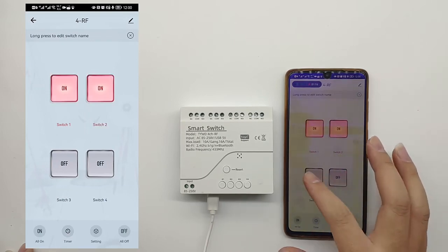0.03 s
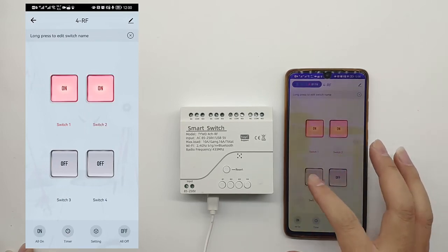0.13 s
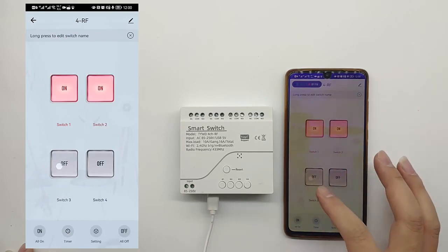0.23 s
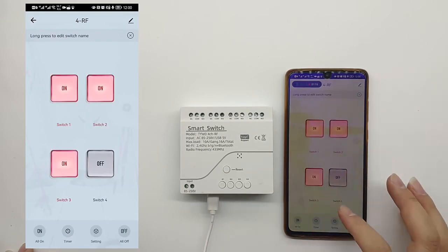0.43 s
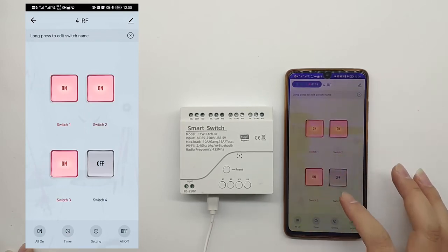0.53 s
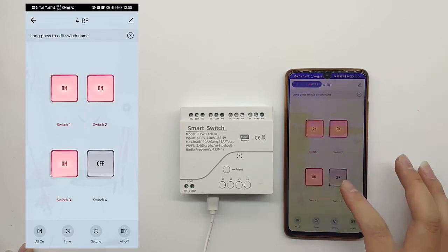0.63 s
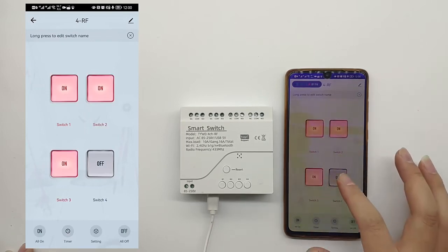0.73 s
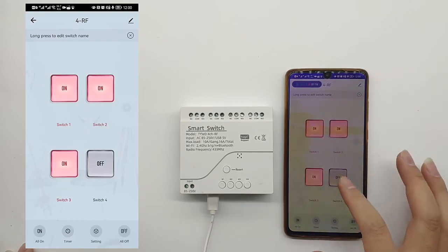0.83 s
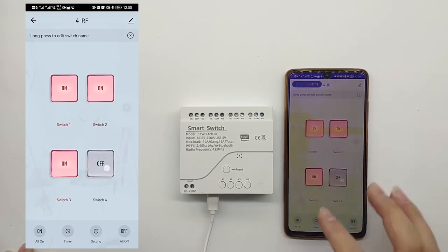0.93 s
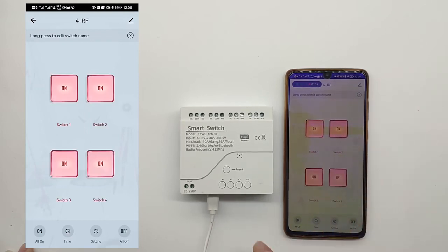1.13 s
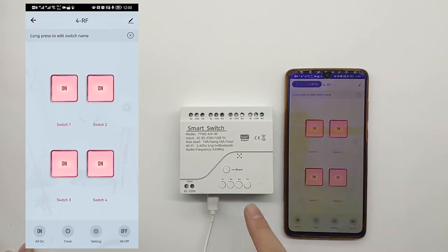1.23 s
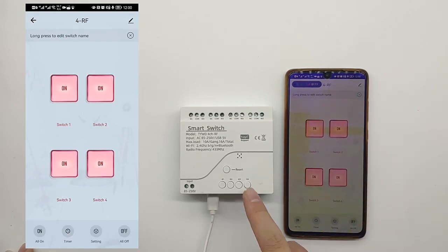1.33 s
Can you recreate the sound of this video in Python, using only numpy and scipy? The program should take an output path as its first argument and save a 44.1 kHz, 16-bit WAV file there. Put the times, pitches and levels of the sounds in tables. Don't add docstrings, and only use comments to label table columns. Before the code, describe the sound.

A small relay snaps with a tiny rattling bounce, cloth rustles faintly, a fingertip ticks on glass, then a second, louder relay snaps; close microphone in a quiet, fairly dry room with low distant traffic hum.

```python
import sys
import numpy as np
from scipy import signal
from scipy.fft import rfft, irfft, next_fast_len
from scipy.io import wavfile
from scipy.ndimage import uniform_filter1d, map_coordinates

SR = 44100
rng = np.random.default_rng(int(sys.argv[2]) if len(sys.argv) > 2 else 0)


def store_wav(level_fs):
    pcm = np.round(np.clip(np.atleast_2d(level_fs), -1, 1) * 32767)
    wavfile.write(sys.argv[1], SR, pcm.T.astype(np.int16))


def ratio_of_db(decibels):
    return 10 ** (np.asarray(decibels, float) / 20)


N = 61739


def unit(x):
    return x / np.sqrt(np.mean(x ** 2) + 1e-20)


def along(points, hz):
    f, v = np.transpose(points)
    return np.interp(np.log(hz + 1), np.log(f + 1), v)


def wobble(rate):
    knots = rng.standard_normal(int(N * rate / SR) + 4)
    return map_coordinates(knots, [np.arange(N) * rate / SR])


def filtered(x, response):
    n = x.shape[-1]
    m = next_fast_len(n + 8192)
    return irfft(rfft(x, m) * response(np.fft.rfftfreq(m, 1 / SR)), m)[..., :n]


def dying(t60, length):
    hz, t, z = signal.stft(rng.standard_normal((2, length)), SR, nperseg=64)
    decay = ratio_of_db(-60 * t / along(t60, hz)[:, None])
    tail = signal.istft(z * decay, SR, nperseg=64)[1][:, :length]
    return tail / np.linalg.norm(tail[0])


def rush(gain, patchy_db):
    # hz, correlation
    alike = [(30, .97), (200, 0.97), (380, 0.21), (700, 0.54), (1290, -0.3), (3000, 0.011)]
    # hz, level_db
    lean = [(60, -7.5), (200, -7.5), (380, -3.5), (1290, -7.5), (2400, -5.5), (4400, -3.5), (8100, -2.5),
            (15000, -28.5)]
    z = signal.stft(rng.standard_normal((2, N)), nperseg=512)[2]
    field = uniform_filter1d(rng.standard_normal(z.shape[1:]), size=6, axis=0)
    field = uniform_filter1d(field, size=10, axis=1)
    pair = signal.istft(z * ratio_of_db(patchy_db * unit(field)), nperseg=512)[1][:, :N]

    def mid_and_side(hz):
        angle = np.arccos(np.clip(along(alike, hz), -1, 1)) / 2
        return gain(hz) * np.array([np.cos(angle), np.sin(angle)])

    mid, side = filtered(pair, mid_and_side)
    ports = np.array([mid + side, mid - side])
    out = filtered(ports, lambda hz: ratio_of_db(np.outer([.5, -.5], along(lean, hz))))
    return out / np.std(out.mean(0))


def relay(pull, modes, case):
    # hz, t60_s
    case_t60 = [(1000, 0.07), (3000, 0.023), (6000, 0.022), (12000, 0.018)]
    # hz, t60_s
    ring_t60 = [(1000, .03), (3300, .018), (9000, .026), (13000, .032)]
    scatter_db, case_db, rise_s = 1.5, 6, .0005
    fade_db_s = [247, 0]
    n = SR // 8
    t = np.arange(n) / SR
    hz, level = np.transpose(modes)[:, :, None]
    decay_db = 60 * t / along(ring_t60, hz)
    out = np.zeros((2, N))
    for start_s, level_db in pull:
        level_chance, phase_chance = rng.standard_normal((2, len(hz), 1))
        envelope = ratio_of_db(level + scatter_db * level_chance - decay_db)
        ring = [(envelope * np.sin(2 * np.pi * hz * t + spread * phase_chance)).sum(0)
                for spread in (3, 2)]
        rattle = filtered(20 * dying(case_t60, n), lambda f: ratio_of_db(along(case, f) + case_db))
        strength = ratio_of_db(level_db - np.outer(fade_db_s, t)) * (1 - np.exp(-t / rise_s))
        out[:, round(start_s * SR):][:, :n] += strength * (ring + rattle)
    return out


def relays():
    # start_s, level_db
    pull_a = [
        (.2000, -55),
        (.2010, -39),
        (.2021, -27),
        (.2036, -28),
        (.2047, -28.5),
        (.2066, -30),
        (.2098, -42),
        (.2132, -37),
        (.2178, -51),
        (.2232, -44),
    ]
    # start_s, level_db
    pull_b = [
        (.8835, -65),
        (.8846, -41),
        (.8854, -29),
        (.8867, -34.5),
        (.8884, -20),
        (.8903, -31.5),
        (.8942, -39.5),
        (.8978, -31.5),
        (.9050, -39.5),
        (.9120, -44),
    ]
    # hz, level_db
    modes_a = [(780, -32), (1590, -9.5), (3060, -26), (3340, -8), (3640, -7.5), (4900, -17), (9430, -3),
               (10000, -26), (10650, -29), (11390, -1), (11800, -6), (12210, -2), (14630, -9), (15230, -4)]
    modes_b = [(800, -24.5), (1150, -29), (1800, -22), (2370, -20), (3400, -14.5), (3600, -14), (7700, -16),
               (9930, -8.5), (10630, -10.5), (11340, -5), (12900, -14), (13470, -7.5), (14000, -16),
               (14420, -6.5)]
    # hz, level_db (per Hz)
    case_a = [(500, -34), (2200, -21.5), (3200, 1.5), (4300, -13), (8700, -10.5), (11500, -3.5),
              (15000, -1), (16800, -34)]
    case_b = [(500, -47.5), (2800, -15), (3500, -4), (4500, -17.5), (8700, -12), (11000, -6), (14000, -4),
              (15700, -31)]
    # hz, level_db
    shadow = [(700, -2.5), (1500, -4.5), (3300, -10.5), (5000, 4), (7500, -0.5), (9500, -11), (12000, -36),
              (15000, -50)]
    left_lead_s = .0009
    both = relay(pull_a, modes_a, case_a) + relay(pull_b, modes_b, case_b)

    def ports(f):
        left = ratio_of_db(along(shadow, f)) * np.exp(2j * np.pi * f * left_lead_s)
        return np.array([left, np.ones_like(f)])

    return filtered(both, ports)


def room_answer(box):
    # hz, t60_s
    room_t60 = [(1000, 0.12), (4000, 0.093), (14000, 0.13)]
    delayed = np.pad(box, ((0, 0), (300, 0)))
    return ratio_of_db(-23) * signal.fftconvolve(delayed, dying(room_t60, SR // 3), axes=1)[:, :N]


def sleeve():
    # time_s, level_db
    effort = [(0, -86), (.2, -78), (0.269, -63.5), (.36, -67.5), (.4, -76.5), (.43, -72), (.46, -74.5),
              (.52, -66), (.6, -63.5), (.65, -70), (.68, -73.5), (.8, -78.5), (.84, -79), (.9, -73),
              (1, -69), (1.08, -78), (1.17, -106.5), (1.4, -96)]
    # hz, level_db (per Hz)
    cloth = [(240, -31), (400, -4), (663, -41.5), (761, -14.5), (1120, -5), (1690, -16), (2600, -9.5),
             (7030, -20), (15600, -26.5)]
    s, db = np.transpose(effort)
    swell_db = np.interp(np.arange(N) / SR, s, db) + 1.1 * wobble(39.1)
    return ratio_of_db(swell_db) * rush(lambda f: ratio_of_db(along(cloth, f)), patchy_db=0.6)


def ticks():
    # start_s, level_db, pitch_hz, t60_s, relative_width
    touches = [
        (.8045, -54, 5900, .010, .22),
        (.834, -62, 3150, .016, .2),
        (.255, -66, 2950, .35, .15),
    ]
    out = np.zeros((2, N))
    t = np.arange(SR // 5) / SR
    for start_s, level_db, pitch_hz, t60_s, width in touches:
        noise = rng.standard_normal((2, len(t)))
        puff = unit(filtered(noise, lambda f: 1 / (1 + ((f - pitch_hz) / (width * pitch_hz)) ** 4)))
        puff = puff * ratio_of_db([[-3], [3]])
        out[:, round(start_s * SR):][:, :len(t)] += ratio_of_db(level_db - 60 * t / t60_s) * puff
    return out


def hum_band(hz, width_hz):
    return rush(lambda f: 1 / (1 + ((f - hz) / width_hz) ** 2), patchy_db=0.57)


def room_tone():
    # time_s, swell_db
    traffic = [
        (0, 4),
        (.15, -4),
        (.35, 1),
        (.6, 1.5),
        (.85, -2.5),
        (1.05, 0.5),
        (1.17, -12.5),
        (1.4, 1),
    ]
    # hz, level_db (per Hz)
    air = [(12, -42), (20, -10.5), (91, -8), (117, -10.5), (151, -10), (306, -8), (329, -14), (380, -15),
           (1500, -23.5), (1950, -24), (3300, -120)]
    # pitch_hz, width_hz, level_db
    hums = [
        (27.1, 3.6, -69),
        (149.65, 4.2, -67.5),
        (216.6, 27, -68),
    ]
    swell_db = np.interp(np.arange(N) / SR, *np.transpose(traffic))
    out = ratio_of_db(-63.5 + 0.41 * swell_db) * rush(lambda f: ratio_of_db(along(air, f)), patchy_db=0.8)
    for (pitch_hz, width_hz, level_db), follows in zip(hums, (1.3, .3, .6)):
        out += ratio_of_db(level_db + follows * swell_db) * hum_band(pitch_hz, width_hz)
    return out


def motor_whine():
    middle_s, span_s = .54, .2
    passing = np.exp(-((np.arange(N) / SR - middle_s) / span_s) ** 4)
    return ratio_of_db(-75) * passing * hum_band(648, 12)


def microphone_hiss():
    # hz, level_db (per Hz)
    hiss = [(710, -7.5), (1200, -3), (1540, -14.5), (2010, -11.5), (2210, -11.5), (4400, -15), (5390, -15),
            (7440, -20), (15600, -29)]
    return ratio_of_db(-71.5) * rush(lambda f: ratio_of_db(along(hiss, f)), patchy_db=1.4)


def scene():
    box = relays()
    background = room_tone() + motor_whine() + microphone_hiss()
    return box + room_answer(box) + sleeve() + ticks() + background


def top_cut(x):
    return signal.sosfilt(signal.butter(12, 16850, fs=SR, output="sos"), x)


def record(dry):
    top_hz, edge_hz, above_db = 15650, 50, -42

    def low_pass(f):
        return ratio_of_db(above_db / (1 + np.exp(np.clip((top_hz - f) / edge_hz, -50, 50))))

    mix = filtered(dry, low_pass)
    return top_cut(mix)


dry = scene()
out = record(dry)
store_wav(out)
```